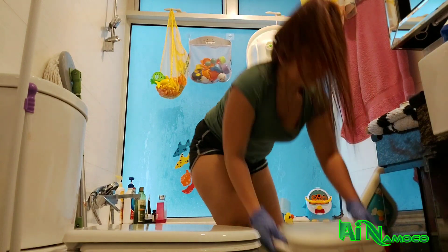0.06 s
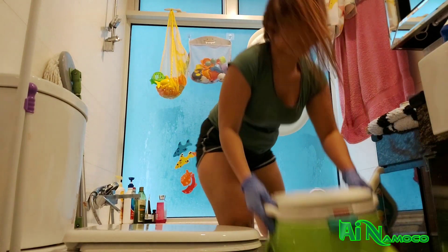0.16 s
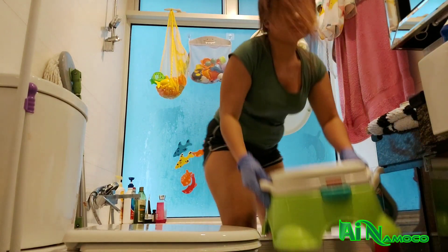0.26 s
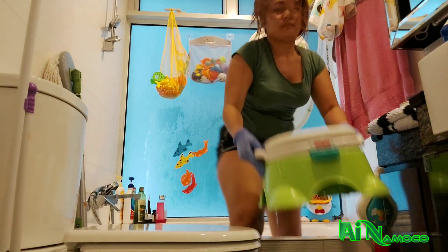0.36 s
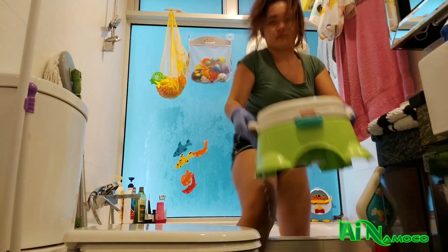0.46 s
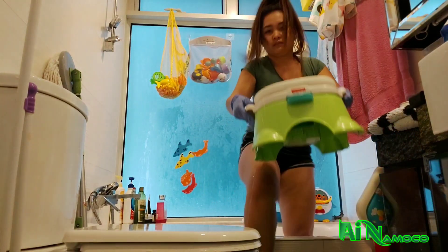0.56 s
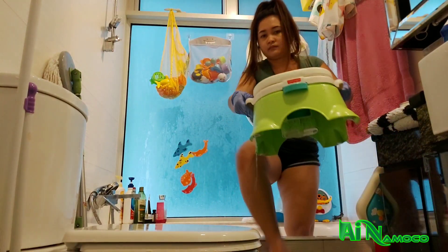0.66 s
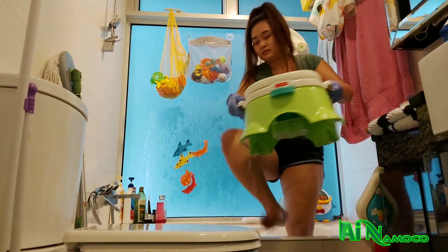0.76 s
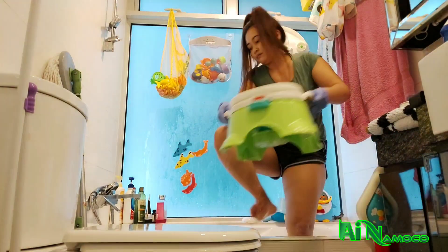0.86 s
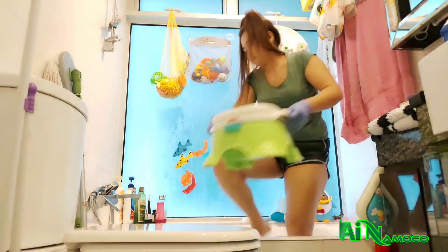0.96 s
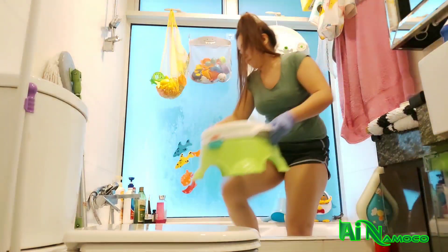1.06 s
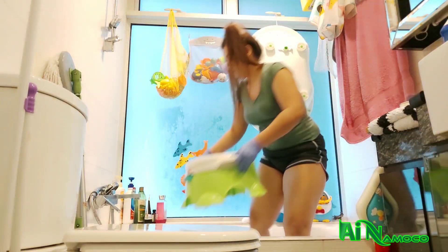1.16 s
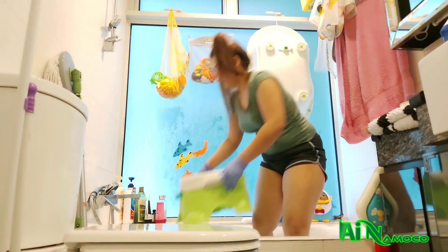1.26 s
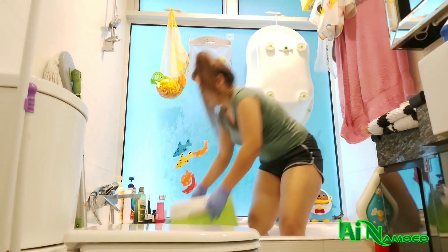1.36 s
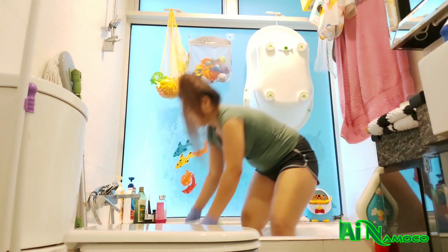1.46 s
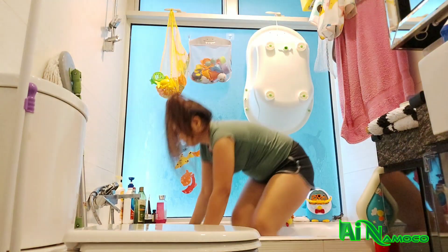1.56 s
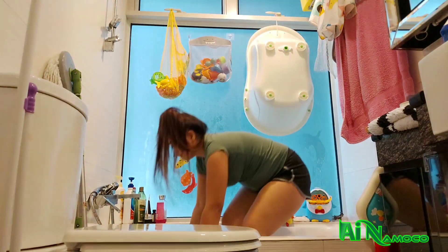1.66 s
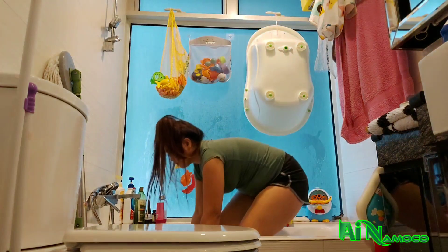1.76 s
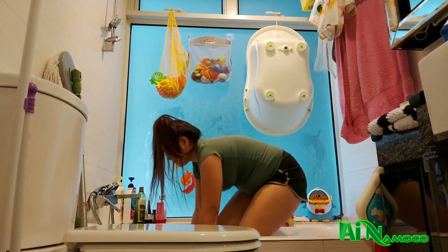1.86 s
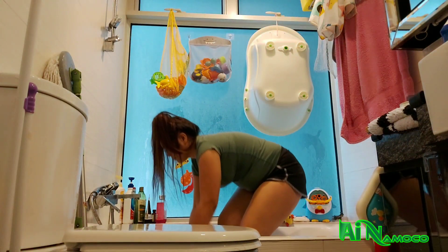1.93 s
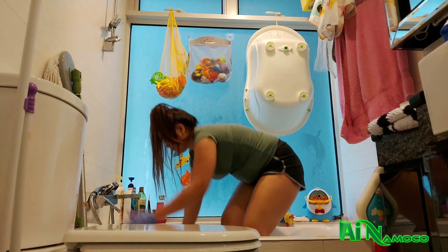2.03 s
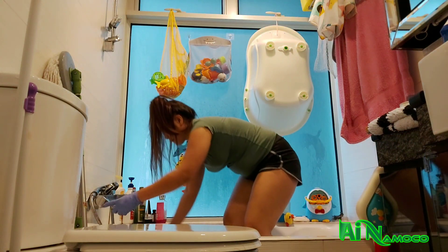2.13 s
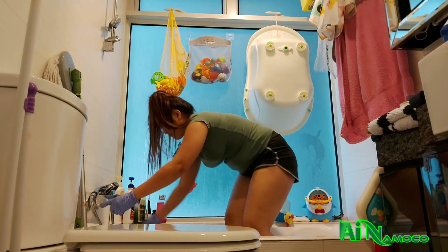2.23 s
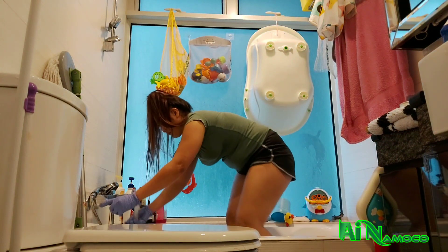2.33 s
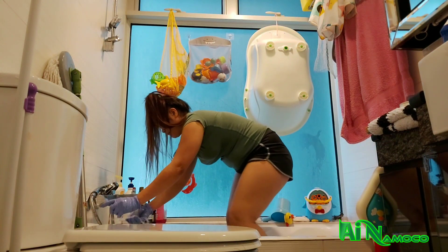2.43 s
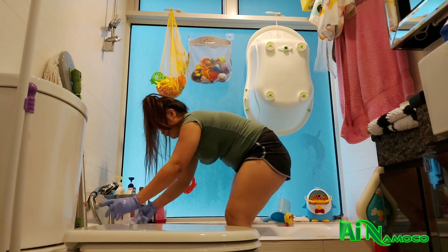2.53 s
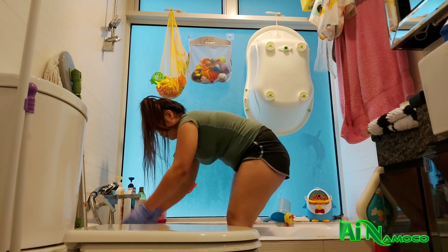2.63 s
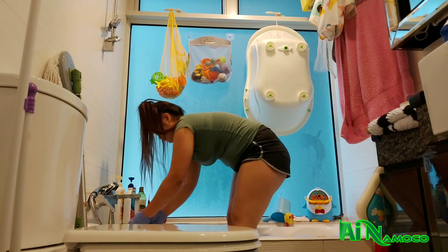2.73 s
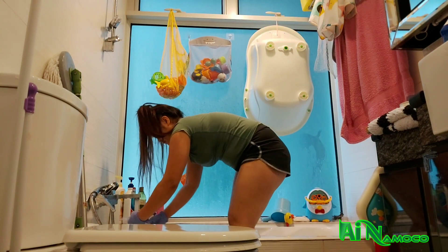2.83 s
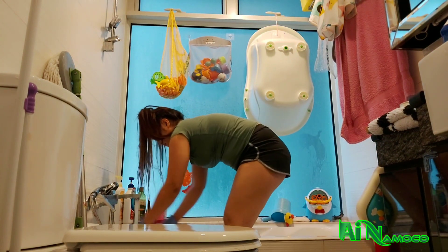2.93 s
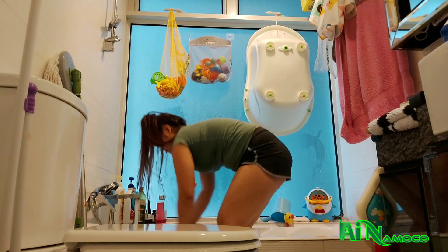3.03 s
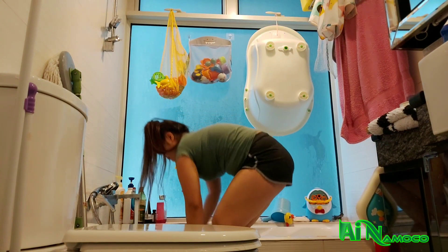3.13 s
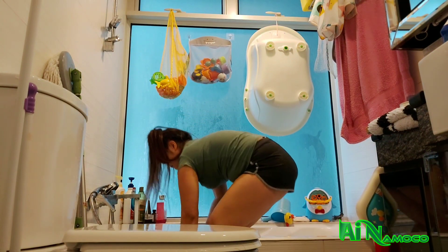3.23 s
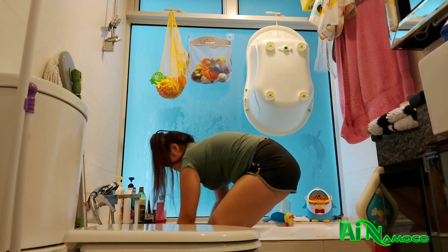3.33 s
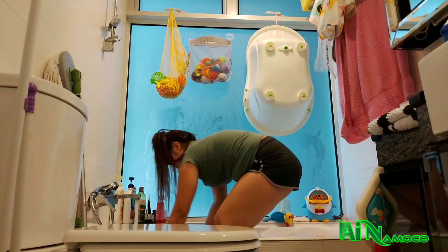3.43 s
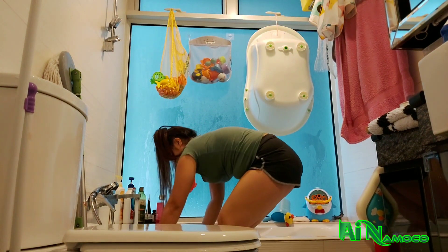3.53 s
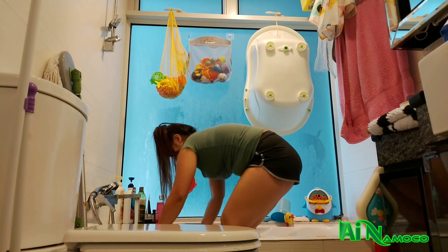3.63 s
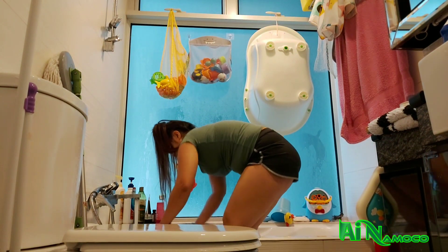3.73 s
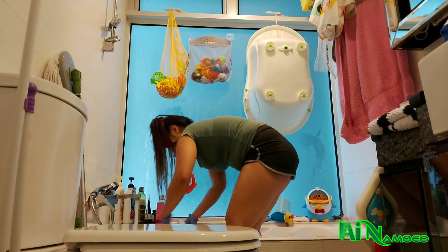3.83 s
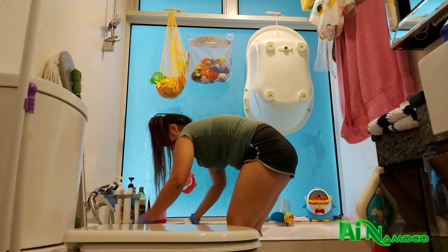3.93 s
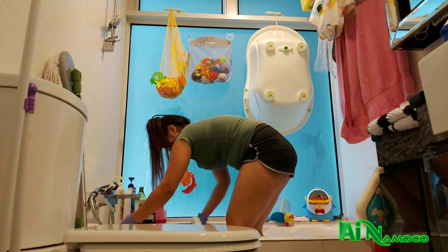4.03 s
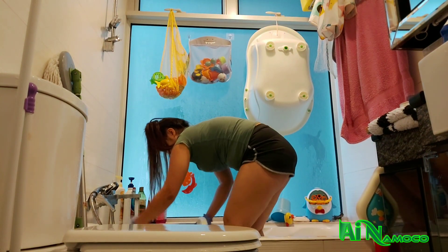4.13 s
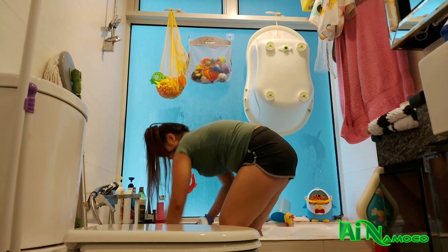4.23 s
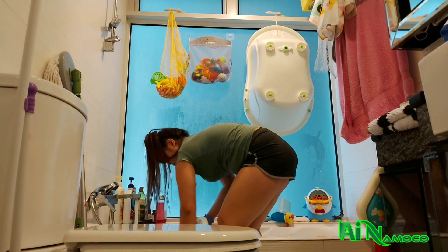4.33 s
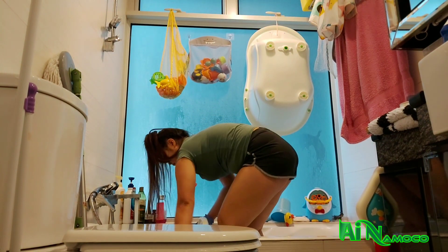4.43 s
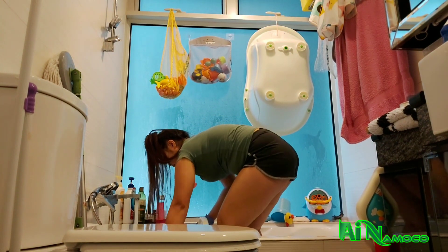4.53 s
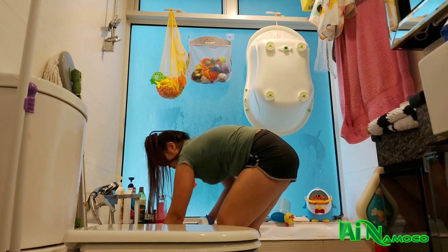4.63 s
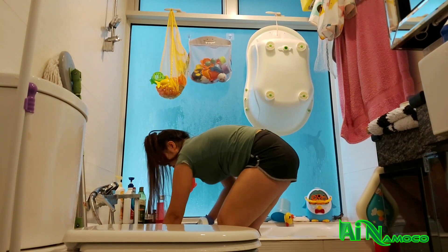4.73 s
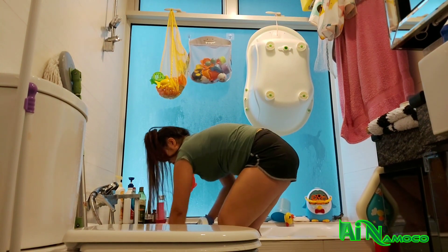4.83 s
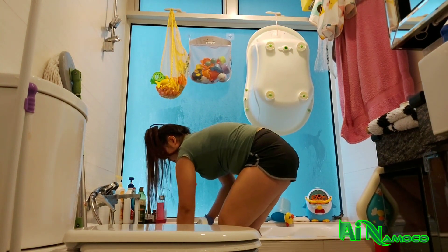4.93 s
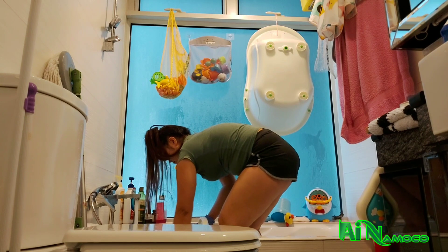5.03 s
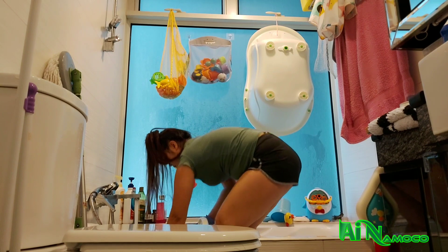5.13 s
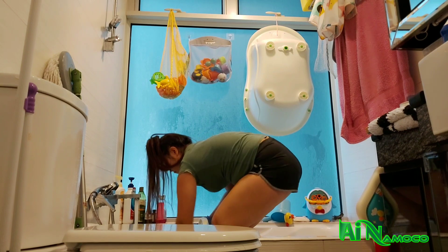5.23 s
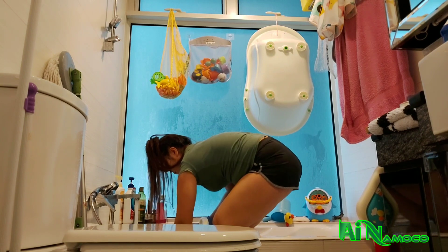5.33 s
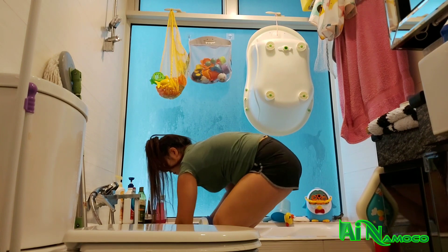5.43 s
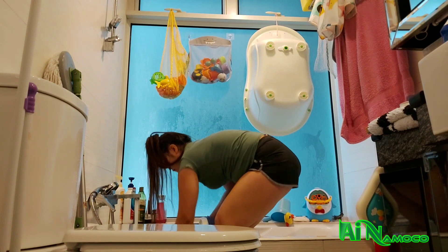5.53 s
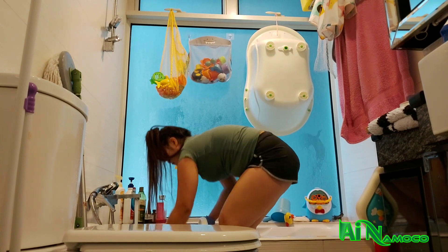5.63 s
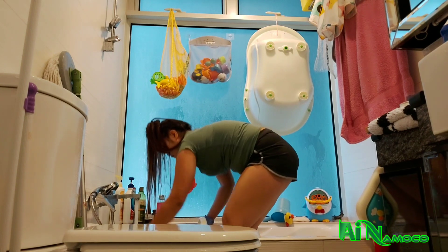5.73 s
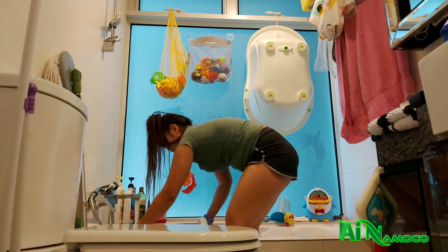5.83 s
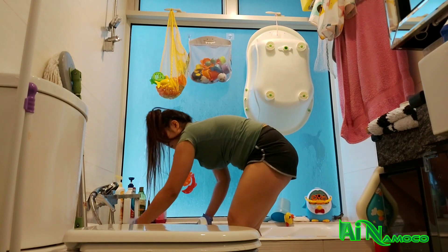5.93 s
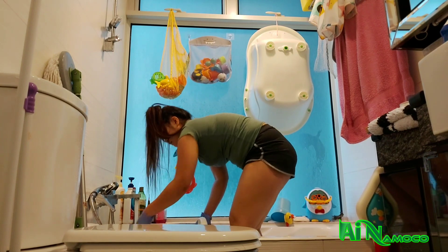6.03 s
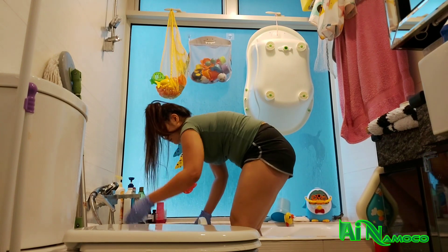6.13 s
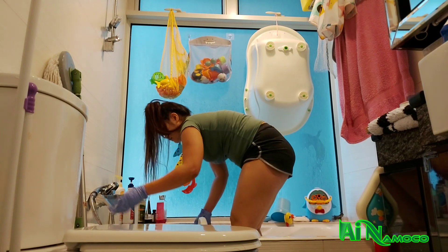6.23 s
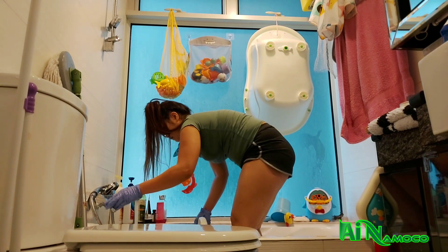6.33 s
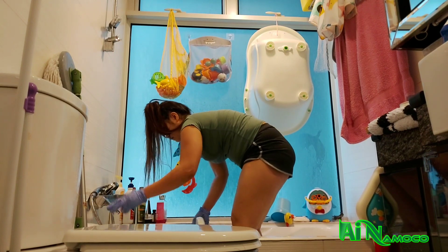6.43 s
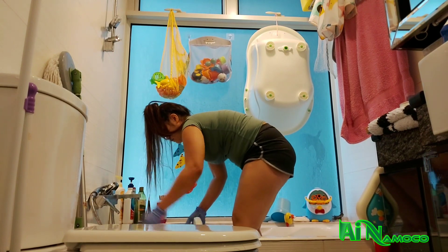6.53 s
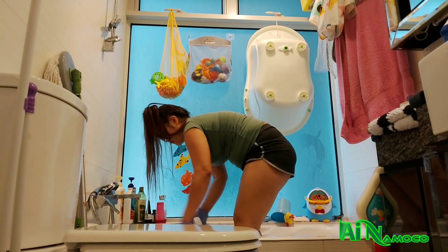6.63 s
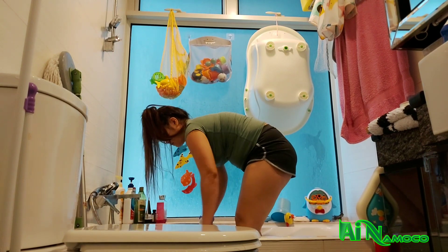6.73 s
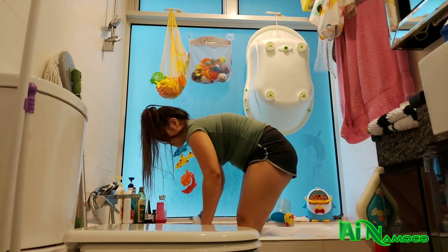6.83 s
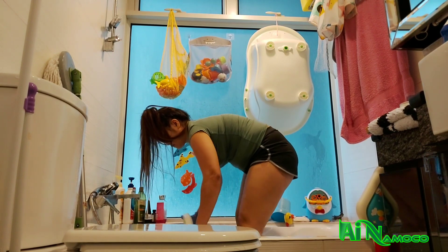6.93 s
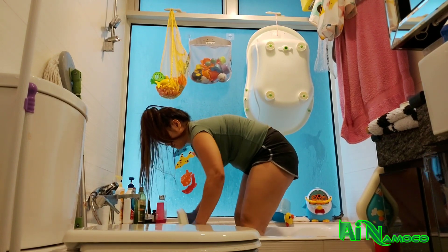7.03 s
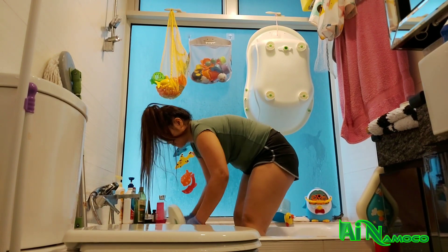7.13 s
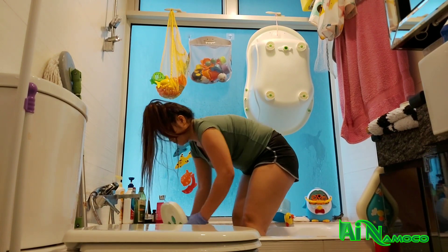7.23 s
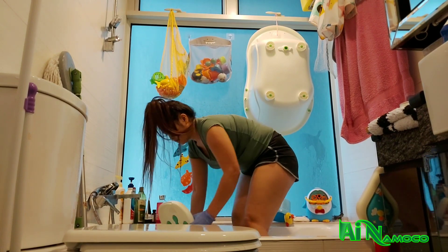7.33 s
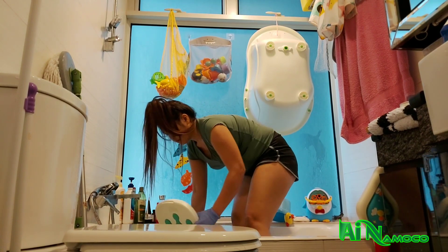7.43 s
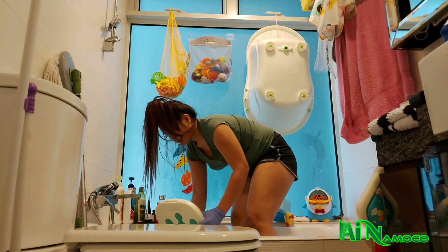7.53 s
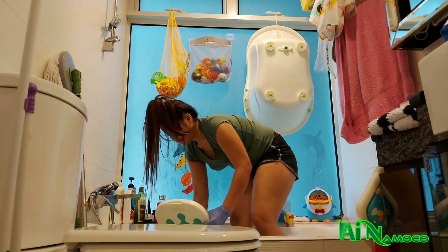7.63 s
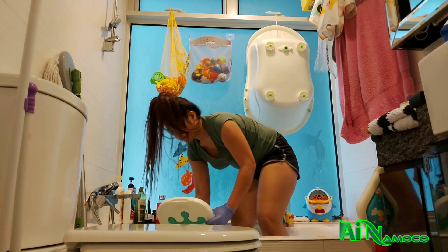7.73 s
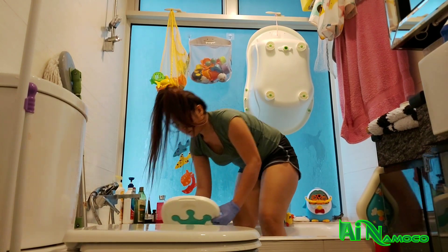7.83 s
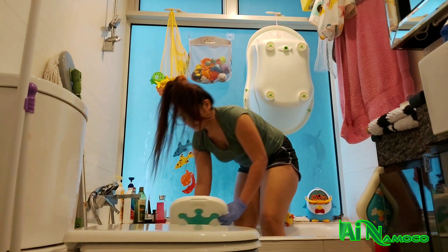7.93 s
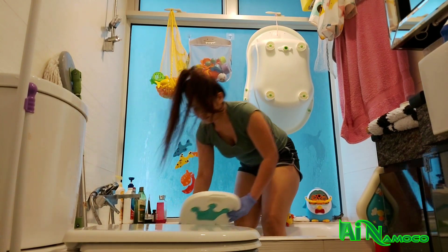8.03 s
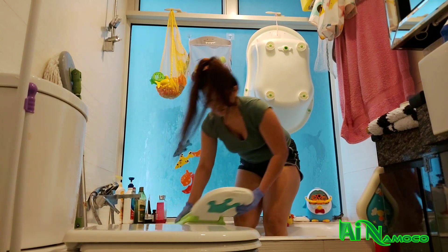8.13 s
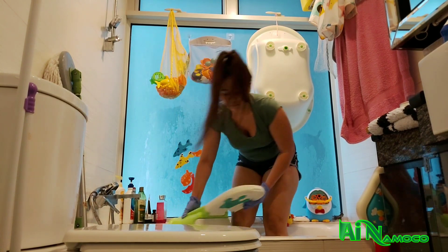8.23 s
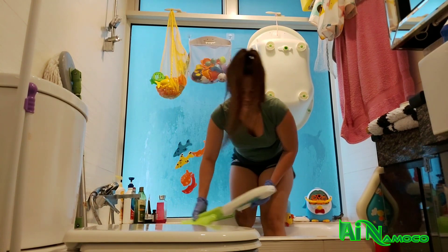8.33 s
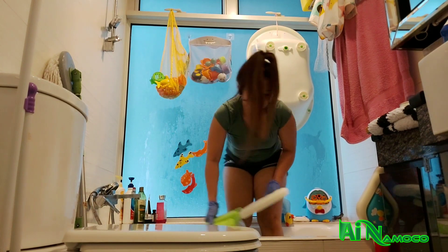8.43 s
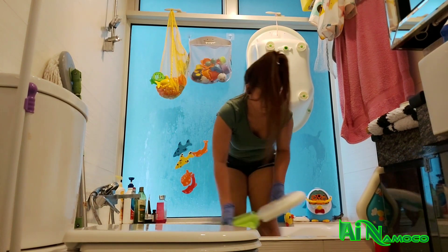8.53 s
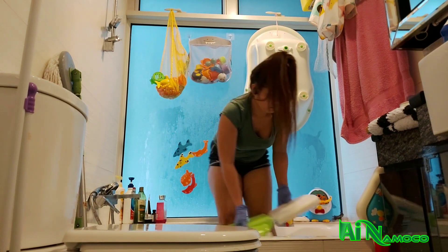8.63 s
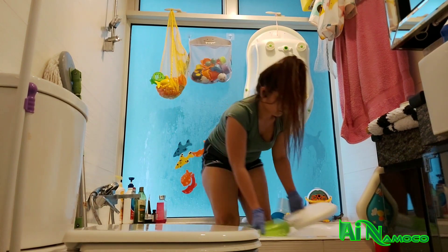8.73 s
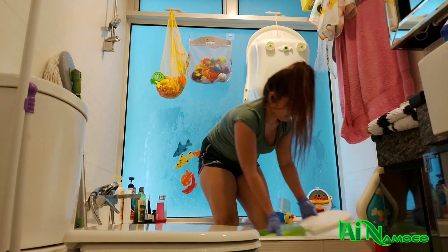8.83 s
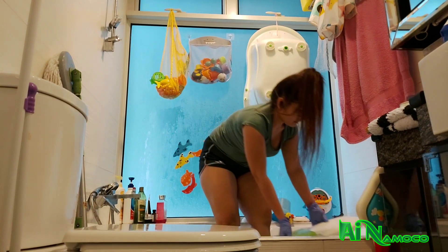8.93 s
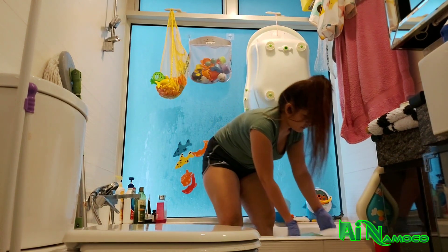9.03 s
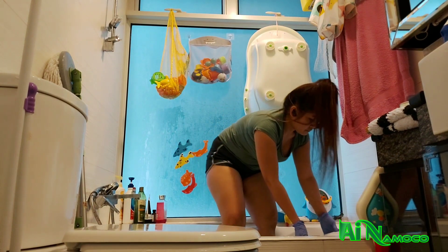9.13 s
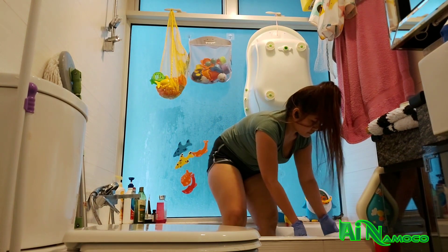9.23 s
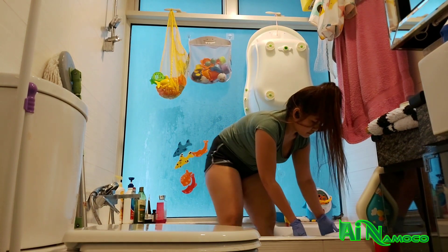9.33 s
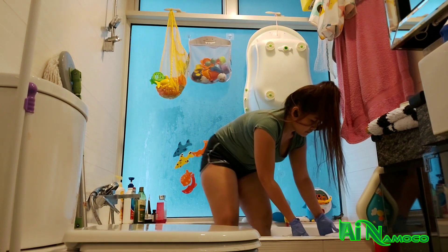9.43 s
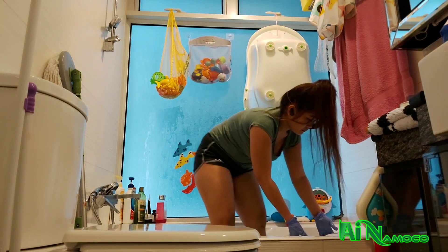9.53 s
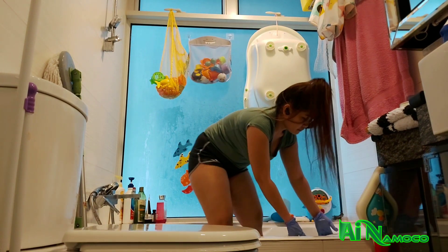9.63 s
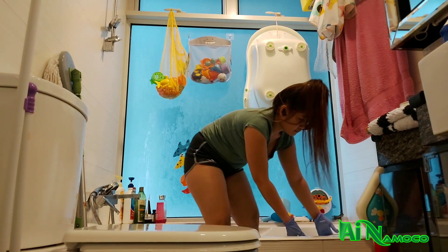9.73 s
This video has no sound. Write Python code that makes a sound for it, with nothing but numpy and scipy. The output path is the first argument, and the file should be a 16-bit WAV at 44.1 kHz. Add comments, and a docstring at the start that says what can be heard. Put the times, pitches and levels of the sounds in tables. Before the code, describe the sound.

A plastic stool clatters hollowly into a bathtub, a hand shower hisses and splatters over it amid knocks, then it is lifted out and set down.

```python
"""A small tiled bathroom, where a bathtub is being cleaned. A plastic step stool is dropped in the tub,
a hand shower hisses over it while it is scrubbed and bumped about, then it is lifted out and set down.
Blows ring the tub's own notes; water, rubs and steps are noise shaped in colour and level; squeaks are
gliding tones. The blows, rubs, squeaks, steps and patter get short, boxy reflections."""
import sys
import numpy as np
from scipy import signal
from scipy.fft import rfft, irfft, next_fast_len
from scipy.io import wavfile
from scipy.ndimage import uniform_filter1d

SR = 44100
rng = np.random.default_rng(int(sys.argv[2]) if len(sys.argv) > 2 else 0)


def transcribe(u):
    """Save the signal u as a 16-bit wav file named by the first command-line argument.

    u: samples, shape (n,) or (channels, n), limited to [-1, 1]; the rate is SR.
    q: integer samples, one column per channel.
    """
    v = np.clip(np.atleast_2d(u).T, -1, 1)
    q = np.round(v * 32767).astype(np.int16)
    wavfile.write(sys.argv[1], SR, q)


N = 430857  # samples in the whole scene
RING = 2 ** 14  # samples given to each ringing sound

# Blows and scrapes of plastic on the tub. Each row: start in seconds, contact length in seconds,
# strength in dB, hardness in dB, thump over the strength in dB, note of the spot struck in Hz,
# that note over the rest in dB.
KNOCKS = [(1.725, 0.029, -36.5, -1.5, 0, 323, -4), (1.746, 0.034, -17, 7, -18, 642, -0.5),
          (1.773, 0.032, -15.5, 1, -28, 316, -3), (1.83, 0.027, -16.5, -0.5, -8.5, 642, -4),
          (1.862, 0.029, -21, -3.5, -13, 425, 1), (1.937, 0.047, -37, -7.5, -10, 440, -4.5),
          (1.989, 0.031, -29.5, 1, -14.5, 690, -4), (2.012, 0.023, -25, -8, -14.5, 319.3, 10),
          (2.028, 0.039, -20, -7.5, -17.5, 323.3, 0), (2.473, 0.034, -46.5, 22, -24, 860, 4),
          (2.654, 0.037, -39.5, -21.5, -3.5, 312, 10.5), (2.691, 0.01, -23.5, -5.5, -19, 662, 6.5),
          (2.722, 0.031, -34, -3, -16.5, 605, -0.5), (2.817, 0.026, -35.5, -17, -6, 293, -13.5),
          (3.121, 0.038, -36, -20, -2, 316, -3), (3.293, 0.035, -33, -4.5, -13.5, 321, -4),
          (3.539, 0.043, -25.5, -4, -5.5, 425, -7), (3.591, 0.032, -22.5, -7, -27.5, 423, 1),
          (3.722, 0.034, -31, -7, -7, 420, -3.5), (3.822, 0.021, -29, -8.5, -5.5, 436, -26),
          (3.848, 0.041, -25.5, -3, -9, 318.5, -7.5), (4.167, .034, -19, 1.5, -11, 316, -5.5),
          (4.332, 0.031, -32.5, -2, -27.5, 337, -7.5), (4.389, 0.037, -30.5, -8, -11, 343, -6.5),
          (4.692, 0.022, -23.5, 5.5, -8.5, 327, -1), (4.738, 0.016, -30, 7, -15, 322, 4),
          (4.773, 0.032, -29, -9, -19, 266, -3.5), (5.052, 0.021, -35, 9, -18, 613, 2),
          (5.229, 0.02, -37, -0.5, -2, 242, -5), (5.247, 0.028, -25.5, -0.5, -10.5, 318, -9.5),
          (5.323, 0.02, -26, -4, -17.5, 355, 3.5), (5.344, 0.029, -18.5, 4.5, -19, 627, -6.5),
          (5.468, 0.032, -20.5, -5, -20, 630, 0.5), (5.518, 0.015, -28, -4, -19, 316, 3.5),
          (5.539, 0.017, -12.5, -3.5, -34.5, 622, 1), (5.562, 0.028, -22, -2, -29, 316, -5),
          (6.741, 0.033, -36, -2.5, -17, 315, -3), (6.786, 0.03, -33.5, -3, -7.5, 603, -3.5),
          (6.858, 0.035, -23.5, 0.5, -7.5, 618, 1), (6.99, 0.029, -44, -6, -14, 315, -12),
          (7.139, 0.08, -41.5, 4, -30, 614, -15), (7.231, 0.012, -26.5, 13, -18, 625, -4),
          (7.237, 0.031, -18, -2.5, -16.5, 316, -12), (7.26, 0.017, -16.5, -5.5, -10.5, 256, -9),
          (7.297, 0.037, -30.5, -4, -10.5, 316, -19), (7.521, 0.41, -46, 1.5, -28, 319, -2.5),
          (7.696, 0.026, -24, -10, -8, 306, -18), (7.808, 0.12, -39, -1, -11, 319.6, -3),
          (7.977, 0.018, -45, 3, -16, 319, -4), (8.373, 0.036, -49.5, 9, -17, 615, -5),
          (8.678, 0.037, -35.5, -1, -17.5, 442, -8), (8.977, 0.04, -39, -4.5, -8, 320, -11),
          (9.027, 0.03, -33.5, -4, -15, 317, -3), (9.073, 0.039, -36.5, -3, -9, 452, -8),
          (9.163, 0.024, -10.5, -2, -5.5, 454, -5), (9.21, 0.032, -27, -7, -10, 618, -13),
          (9.56, 0.044, -43.5, -4, -7.5, 312, -12), (9.677, 0.027, -48.5, -1, -10, 463, -11)]
# The hollow ring of tub and room. Each row: note in Hz, width in Hz, level in dB.
TUB_MODES = [(119.2, 20, -7), (162.1, 24, -2.5), (247.7, 31, -3), (316, 19, 1.5), (378, 66, -1.5),
             (425, 41, -5.5), (470, 55, -3), (545.7, 76, -4.5), (625.5, 57, 1), (702.4, 51, -3),
             (784, 170, -4), (938, 80, -10.5), (1100, 90, -8.5)]
# The brittle top of a blow. Each row: frequency in Hz, level in dB.
CLACK = [(500, -32.5), (1000, 2), (1450, -1), (2200, -8), (3000, -12.5), (4200, -15.5), (6400, -23),
         (7900, -20.5), (16000, -31.5)]
# The stool rebounds once, this long after each blow starts.
REBOUND_S, REBOUND_DB = .035, -15
# The clack relative to its blow grows with hardness, and with strength over a firm blow (dB per dB).
CLACK_DB, CLACK_PER_HARDNESS, CLACK_PER_STRENGTH, FIRM_BLOW_DB = -16.5, 0.88, 0.15, -25
# The room's longest standing wave, which hums on after the blows.
HUM_HZ, HUM_WIDTH_HZ, HUM_DB = 324, 7.8, -8.5

# Colours of the hiss, the splatter, the drumming and the fine mist from the shower head.
# Each row: frequency in Hz, level in dB.
HISS = [(900, -31), (2500, -13), (4000, -2.5), (4900, -5.5), (7050, -1.5), (7700, 3), (9000, 0.4),
        (10500, -1), (12200, 0.5), (14000, -5.5), (16000, -0.5)]
SPLATTER = [(500, -23), (900, -17), (1100, -5.5), (1750, -2.5), (2180, 0.5), (2500, -1.5), (3500, -3),
            (5000, -4), (9000, -16.5)]
DRUM = [(30, -33), (65, -3), (110, -0.5), (200, -8), (320, 1.5), (480, -8.5), (650, -1.5), (850, -2.5),
        (1300, -3.5), (3000, -25)]
MIST = [(900, -7.5), (2100, 1.5), (5000, -15), (6800, -7.5), (8000, -3), (10500, -4), (12300, 5),
        (14000, -0.5), (16000, 1.5)]
MIST_DB = -40
# The tap: when it is fully open and when it starts to close, and how fast the flow comes and goes.
TAP_OPEN_S, TAP_CLOSE_S, OPEN_DB_PER_S, CLOSE_DB_PER_S = 2.462, 6.69, 103, 174
# The first water bursts out of the head abruptly.
FIRST_WATER_S, BURST_DB_PER_S = 2.335, 598
# Spray on the bare tub, before small trims; hiss and splatter start weak and build with the pressure.
BARE_HISS_DB, BARE_SPLATTER_DB, BARE_DRUM_DB = -36, -44.5, -47
WEAK_START_DB, PRESSURE_S = -10.5, 0.39
# Passes of the spray over the stool, before small trims. Each row: start in seconds, end in seconds,
# hiss of the jets in dB, splatter on hollow plastic in dB, drumming on the tub in dB,
# ring of the stool in dB, speed of the rise in dB per second.
PASSES = [(2.851, 2.904, -30, -36, -46, -58.5, 147), (3.131, 3.34, -26.5, -31.5, -39.5, -45.5, 452.5),
          (3.33, 4.062, -27, -33.5, -41.5, -51.5, 450), (4.185, 4.278, -31.5, -50, -40.5, -64, 124),
          (4.338, 5.343, -27, -33.5, -41, -50, 401), (5.36, 5.68, -29.5, -37.5, -36.5, -39, 403),
          (5.75, 5.865, -28, -34, -49, -42.5, 34), (6.209, 6.563, -29, -33.5, -44, -47, 450),
          (6.58, 6.673, -29, -47, -46.5, -61, 200)]
# The spray slides off the stool slowly.
LEAVE_DB_PER_S = 100
# As the tap closes, splatter, drumming and stool ring start to die this much sooner than the hiss.
HEAVY_LEAD_S = 0.092

# Slides of the wet stool in gloved hands. Each row: start in seconds, end in seconds,
# level in dB before a small trim.
SLIDES = [(7.188, 7.413, -38), (8.612, 8.686, -56), (9.122, 9.158, -48)]
# Each slide swells quickly and dies slowly.
SLIDE_RISE_DB_PER_S, SLIDE_FALL_DB_PER_S, SET_DOWN_S = 229, 52, 9.17
# Colour of those slides. Each row: frequency in Hz, level in dB.
RUSTLE = [(50, -7), (200, 1), (400, 5), (900, 6), (1500, -5.5), (2000, -2.5), (2700, -8.5), (3400, -14),
          (4300, -14.5), (6500, -20), (8200, -18), (12000, -19), (16000, -23)]
# Notes of the stool's shell, dragged off the floor. Each row: note in Hz, width in Hz, level in dB.
SHELL_MODES = [(640, 250, 8), (1000, 200, 2), (1610, 83, 9.5), (2140, 200, -5), (2590, 180, -1),
               (3300, 200, -21), (4350, 180, -1), (8200, 2200, -12)]
# Wet rubs and splashes. Each row: start in seconds, length in seconds before easing in,
# level in dB before a common trim, centre in Hz, width in octaves.
RUBS = [(0.194, 0.043, -54, 8700, 1.55), (0.742, .006, -57, 12500, .28), (0.963, 0.018, -62, 7900, .15),
        (0.994, 0.0092, -48, 10500, 0.33), (1.111, 0.059, -56.5, 6000, 2.5), (1.2, 0.25, -80, 2500, .35),
        (1.42, 0.22, -73.5, 2430, 0.63), (1.466, 0.16, -75, 7040, 1.4), (1.661, 0.28, -52, 8040, 2.1),
        (1.892, 0.014, -32.5, 2430, 1.46), (2.019, 0.033, -28.5, 1820, 1.2),
        (2.192, 0.078, -74.5, 5000, 1.03), (2.287, 0.052, -70, 5150, 0.21),
        (6.609, 0.026, -31.5, 4870, 0.58), (6.778, 0.033, -43.5, 7000, 2.9), (6.928, 0.063, -56, 7000, 2.5),
        (7.089, 0.041, -46, 1580, 2.1), (7.347, 0.026, -34, 3300, 1.6), (7.397, 0.027, -37.5, 2580, 1.4),
        (7.504, 0.022, -42, 1820, 0.43), (7.586, 0.019, -43, 3500, 2.4), (7.845, 0.044, -49, 1840, 0.97),
        (7.954, 0.056, -54, 7950, 5.6), (8.23, 0.047, -61, 1940, 0.35), (8.218, 0.026, -64, 7600, 0.29),
        (8.393, 0.023, -62, 4900, 0.2), (8.394, 0.02, -61, 2640, 0.29), (8.409, .04, -57, 1930, 2.5),
        (8.429, 0.036, -46, 8200, 1.56), (8.497, 0.12, -65, 1500, 0.68), (8.624, 0.037, -50.5, 9100, 0.76),
        (8.737, 0.042, -46, 12000, 0.61), (8.682, .045, -64, 1870, .3), (8.745, 0.031, -59, 4230, 0.32),
        (8.901, 0.032, -63.5, 3760, 0.22), (8.902, 0.031, -63, 7600, 0.49), (8.992, 0.053, -62, 8060, 0.34),
        (9.064, 0.025, -45.5, 1650, .45), (9.084, 0.02, -54, 2640, 0.15), (9.087, 0.014, -64, 3900, .15),
        (9.308, 0.022, -70, 7550, .15), (9.389, .02, -58, 3670, .2), (9.391, 0.028, -48, 8100, 1.9),
        (9.414, 0.033, -52, 2520, 0.45), (9.417, 0.012, -57, 1650, 0.28)]
# Tone of every rub, as the microphones take it. Each row: frequency in Hz, level in dB.
SHEEN = [(800, 18), (2700, 1.5), (3500, 1.5), (4300, 0.5), (6600, -1.5), (7800, 3), (11500, -0.5),
         (13500, -2), (16000, -10)]
# Squeaks of wet gloves on plastic. Each row: start in seconds, length in seconds, level in dB,
# start pitch in Hz, end pitch in Hz.
SQUEAKS = [(7.505, 0.025, -41, 1047, 1490), (8.235, 0.023, -68, 1780, 1950),
           (8.398, .035, -64.5, 2330, 2480), (8.534, .07, -63.5, 1270, 1350),
           (9.071, .022, -50, 1650, 1470), (9.08, 0.024, -52, 2870, 2730), (9.408, 0.047, -57, 2560, 2790)]
# Soft footfalls. Each row: start in seconds, level in dB before a common trim.
STEPS = [(0.649, -49), (0.8, -48), (.86, -49), (1.061, -37.5), (1.299, -50), (1.491, -48), (8.168, -51.5),
         (8.312, -53), (8.43, -47), (8.619, -46), (8.78, -45)]
# Steady room air. Each row: frequency in Hz, level in dB.
AIR = [(15, -30), (25, -21), (82, 3), (125, 2), (185, -22), (232, -1.5), (270, -7.5), (405, -5), (516, -9),
       (560, -18), (677, -14.5), (1290, -30), (1750, -27), (2150, -37.5), (2700, -35.5), (5880, -46.5),
       (7920, -35.5), (16000, -47)]
AIR_DB = -55.5

# How long the room rings. Each row: frequency in Hz, time to fall by 60 dB in seconds.
ROOM_DECAY = [(100, 0.2), (300, 0.3247), (700, 0.1744), (2000, 0.21), (8000, 0.24), (16000, 0.22)]
# How alike left and right are. Each row: frequency in Hz, likeness (1 is identical).
LIKENESS = [(60, 0.89), (150, 0.9), (300, 0.78), (550, .55), (1000, 0.027), (4000, 0.033), (16000, 0.14)]
# Balance of the microphones. Each row: frequency in Hz, left minus right in dB.
BALANCE = [(60, 1.3), (130, -1), (280, -4), (600, -0.5), (1300, -2), (2400, -7), (4400, 0), (8100, -6.5),
           (15000, -5)]
# Top of the band that is kept.
EDGE_HZ = 15850


def knocks(thump_hz=205, body_hz=930, hard_hz=480, sharp_s=0.019, scrape_s=0.028, uneven_db=1.5):
    """Each blow rings the tub, thumps, clacks the plastic and rebounds; long contacts blur into scrapes."""
    hz, out = bins(RING) + 1, np.zeros((2, N))
    tub = resonances(TUB_MODES, hz, between_db=-33.5)
    low = 1 / np.sqrt(1 + (hz / thump_hz) ** 14) / np.sqrt(1 + (100 / hz) ** 8)
    body = 1 / np.sqrt(1 + (220 / hz) ** 12) / np.sqrt(1 + (hz / body_hz) ** 12)
    gap = np.zeros(round(REBOUND_S * SR))
    mode_hz, _, mode_db = np.transpose(TUB_MODES)
    for s, length, db, hardness_db, weight_db, note_hz, note_db in KNOCKS:
        length = max(length, .005)
        # short contacts begin with a sharp blow, long ones mostly slip
        first = min((sharp_s / length) ** 2, 1)
        force = contact(0.854 * length, slips_per_s=900, first=first)
        rebound = contact(0.854 * length, slips_per_s=900, first=first)
        force = np.r_[force, gap] + gain_of(REBOUND_DB) * np.r_[gap, rebound]
        blow = heard(force, room(early_t60=0.05, tail_db=-11.5, swell_s=0.0047))
        # hard blows are brighter
        tilt = gain_of(.5 * hardness_db * np.tanh(3 * np.log2(hz / hard_hz)))
        clack_db = CLACK_DB + CLACK_PER_HARDNESS * hardness_db
        clack_db += CLACK_PER_STRENGTH * (db - FIRM_BLOW_DB)
        # the struck note and the rest share the strength
        hollow_db = db - 10 * np.log10(1 + gain_of(note_db) ** 2)
        scraped = 1 / (1 + (scrape_s / length) ** 2)
        struck = np.arange(len(TUB_MODES)) == np.argmin(abs(mode_hz - note_hz))
        power = struck * gain_of(hollow_db + note_db) ** 2
        for band, band_db in ((body * tilt, hollow_db), (low, db + weight_db)):
            uneven = mode_db + uneven_db * rng.standard_normal(len(TUB_MODES))
            sizes = np.interp(mode_hz, hz, band) * gain_of(uneven)
            power = power + (1 - scraped) * (gain_of(band_db) * sizes / np.linalg.norm(sizes)) ** 2
            scrape = at_level(colour(blow, tub * band), length, band_db)
            add(out, s - .005, np.sqrt(scraped) * scrape)
        add(out, s, tub_ring(np.where(struck, note_hz, mode_hz), np.sqrt(power), length))
        clack = colour(blow, gain_of(read(CLACK, hz)))
        add(out, s - .002, at_level(clack, length, db + clack_db))
    hum = signal.lfilter(*signal.iirpeak(HUM_HZ, HUM_HZ / HUM_WIDTH_HZ, fs=SR), out)
    return out + gain_of(HUM_DB) * hum


def tub_ring(mode_hz, sizes, length, rise_s=0.0038, sag_s=0.11, echo_db=-15, waver=0.024, apart_hz=800):
    """The tub's notes swell, last with the contact, drop by their own damping and linger in the room."""
    t = np.arange(RING) / SR
    hz, width = mode_hz[:, None], np.array(TUB_MODES)[:, 1:2]
    driven = np.exp(-t / sag_s - np.pi * width * np.maximum(t - length, 0))
    echo = gain_of(echo_db - 60 * t / read(ROOM_DECAY, hz))
    swell = (1 - np.exp(-(t / rise_s) ** 2)) * (driven + echo)
    count = int((length + .01) * SR)
    swell /= np.sqrt(np.mean(swell[:, :count] ** 2, 1, keepdims=True) / 2)
    # the pitch wavers only while plastic touches the tub
    bend = waver * evened(uniform_filter1d(rng.standard_normal(RING), size=300)) * (t < length)
    phase = 2 * np.pi * (hz * np.cumsum(1 + bend) / SR + rng.random(hz.shape))
    # left and right drift out of step as the notes get higher
    apart = (rng.standard_normal(len(hz)) * mode_hz / apart_hz) * np.array([[.5], [-.5]])
    return ((sizes * np.exp(1j * apart)) @ (swell * np.exp(1j * phase))).real


def shower(hiss_db=-0.06, splatter_db=-0.38, flutter_db=.5, splash_db=0.5, throb_db=1.5,
           sway_db=0.37, hollow=0.37):
    """Jets hiss, splatter on plastic, ring the stool and drum on the tub over mist, fluttering together."""
    hiss, splatter, drum, ring = spray_levels()
    jets = patter(per_s=3500, uneven_db=3.5, wash_db=-2.5, count=5)
    drops = patter(per_s=1700, uneven_db=2.5, wash_db=-5.5, count=5)
    mist = MIST_DB + held_db(TAP_OPEN_S, TAP_CLOSE_S, OPEN_DB_PER_S, CLOSE_DB_PER_S)
    # the drumming borrows part of the tub's hollow colour
    hz = np.geomspace(30, 3000, 400)
    tub_db = 20 * np.log10(resonances(TUB_MODES, hz, between_db=-10))
    drummed_tub = np.c_[hz, read(DRUM, hz) + hollow * tub_db]
    water = gain_of(hiss + hiss_db + sway_db * wander(per_s=8.5)) * shaped(jets, HISS)
    water += gain_of(mist) * shaped(rng.standard_normal((2, N)), MIST)
    splashes = shifting(shaped(drops, SPLATTER), depth_db=1.2, patch_hz=700, patch_s=.025)
    water += gain_of(splatter + splatter_db + splash_db * wander(per_s=22)) * splashes
    water += gain_of(ring) * stool_ring(drops)
    drumming = shaped(rng.standard_normal((2, N)), drummed_tub)
    water += gain_of(drum + throb_db * wander(per_s=13)) * drumming
    burst_db = held_db(FIRST_WATER_S, N / SR, BURST_DB_PER_S, 0)
    return water * gain_of(flutter_db * wander(per_s=38) + burst_db)


def spray_levels():
    """Levels in dB of hiss, splatter, drumming and stool ring: bare spray, lifted by each stool pass."""
    since_open = np.maximum(np.arange(N) / SR - TAP_OPEN_S, 0)
    weak_db = WEAK_START_DB * np.exp(-since_open / PRESSURE_S)
    levels = np.array([BARE_HISS_DB + weak_db, BARE_SPLATTER_DB + weak_db,
                       np.full(N, BARE_DRUM_DB), np.full(N, -np.inf)])
    for start, end, *tops, rise_db_per_s in PASSES:
        swell_db = held_db(start, end, rise_db_per_s, LEAVE_DB_PER_S)
        levels = np.maximum(levels, np.array(tops)[:, None] + swell_db)
    fine = held_db(TAP_OPEN_S, TAP_CLOSE_S, OPEN_DB_PER_S, CLOSE_DB_PER_S)
    heavy = held_db(TAP_OPEN_S, TAP_CLOSE_S - HEAVY_LEAD_S, OPEN_DB_PER_S, CLOSE_DB_PER_S)
    return levels + [fine, heavy, heavy, heavy]


def patter(per_s, uneven_db, wash_db, count=1, spots_per_s=14):
    """Dense uneven impacts over a finer wash; they move across spots, each with its own reflections."""
    hits = rng.standard_normal(N) * (rng.random(N) < per_s / SR)
    hits *= gain_of(uneven_db * np.minimum(rng.exponential(1, N), 4))
    spot = np.floor(spots_per_s * np.arange(N) / SR + rng.random(N)) % count
    near = np.zeros((2, N))
    for k in range(count):
        reflections = room(early_t60=0.05, tail_db=-9.0, swell_s=0.00089)[:, :RING // 2]
        near += signal.oaconvolve((hits * (spot == k))[None], reflections, axes=1)[:, :N]
    return evened(near) + gain_of(wash_db) * rng.standard_normal((2, N))


def shifting(pair, depth_db, patch_hz, patch_s):
    """The colour of a splash shifts in patches as the water lands in new places."""
    z = signal.stft(pair, SR, nperseg=512)[2]
    field = rng.standard_normal(z.shape[1:])
    for _ in range(2):
        field = uniform_filter1d(field, max(int(patch_hz * 512 / SR), 1), axis=0)
        field = uniform_filter1d(field, max(int(patch_s * SR / 256), 1), axis=1)
    return signal.istft(z * gain_of(depth_db * evened(field)), SR, nperseg=512)[1][:, :N]


def stool_ring(drops, centre_hz=2200, width_hz=520, drift=0.017):
    """Drops ring the hollow stool; the note drifts as the spray moves across it."""
    note_hz = centre_hz * (1 + drift * wander(per_s=7.5))
    turn = np.exp(2j * np.pi * np.cumsum(note_hz) / SR)
    # shift the note down to zero, keep what is near it, shift back
    ring = signal.lfilter(*signal.butter(2, width_hz / 2, fs=SR), drops / turn)
    return evened((ring * turn).real)


def handling(level_db=-0.5, release_db_per_s=250):
    """A wet rustle while the stool is turned over and lifted out; it dies fast once the stool is set down."""
    grip = np.zeros(N)
    for start, end, db in SLIDES:
        grip += gain_of(db + held_db(start, end, SLIDE_RISE_DB_PER_S, SLIDE_FALL_DB_PER_S))
    carried_db = held_db(0, SET_DOWN_S, 0, release_db_per_s)
    rustle = shaped(patter(per_s=2200, uneven_db=3.5, wash_db=1.0), RUSTLE)
    return grip * gain_of(level_db + carried_db) * rustle


def drag(level_db=-50, start_s=0.54, end_s=0.57, rise_db_per_s=190, fall_db_per_s=185):
    """The stool's shell sings faintly under a rub that swells and fades."""
    swell_db = held_db(start_s, end_s, rise_db_per_s, fall_db_per_s)
    hz = np.geomspace(200, 16000, 400)
    shell_db = 20 * np.log10(resonances(SHELL_MODES, hz, between_db=-37))
    ring = np.r_[[(50, -40)], np.c_[hz, shell_db]]
    return gain_of(level_db + swell_db) * shaped(patter(per_s=1300, uneven_db=0, wash_db=-1.0), ring)


def rubs(level_db=-3.0, ease_s=.003):
    """Wet gloves and sloshed water: short crackling strokes that ease in, each in its own band."""
    hz, out = bins(RING) + 1, np.zeros((2, N))
    for s, length, db, centre_hz, width in RUBS:
        length = length + ease_s
        force = contact(length, slips_per_s=1500, first=.05, taper=0.54)
        stroke = heard(force, room(early_t60=0.024, tail_db=-14.5, swell_s=0.0034))
        octaves_away = np.log2(hz / centre_hz)
        band = gain_of(read(SHEEN, hz)) / (1 + .5 * (octaves_away / width) ** 2) ** 2
        add(out, s - .006, at_level(colour(stroke, band), length, db + level_db))
    return out


def squeaks(overtone_db=-13, jitter=.025, room_db=-2):
    """Wet rubber sticks and slips on plastic: a short, unsteady tone that glides, with one overtone."""
    out = np.zeros((2, N))
    for s, length, db, start_hz, end_hz in SQUEAKS:
        count = int(max(length, .005) * SR)
        unsteady = evened(uniform_filter1d(rng.standard_normal(count), size=30))
        pitch = np.linspace(start_hz, end_hz, count) * (1 + jitter * unsteady)
        phase = 2 * np.pi * np.cumsum(pitch) / SR
        tone = np.sin(phase) + gain_of(overtone_db) * np.sin(2 * phase)
        tone *= signal.windows.tukey(count, .7)
        echo = heard(np.ones(1), room(early_t60=0.064, tail_db=-11, swell_s=.004))
        echo = gain_of(room_db) * echo / np.linalg.norm(echo[0])
        squeak = signal.fftconvolve(echo, tone[None], axes=1)
        add(squeak, 0, np.array([tone, tone]))  # the direct sound
        add(out, s, at_level(squeak, length, db))
    return out


def steps(top_hz=150, length=0.045, level_db=-9.0):
    """Bare feet push softly on the floor: a few small slips, heard only as a dull low thud."""
    hz, out = bins(RING) + 1, np.zeros((2, N))
    dull = 1 / np.sqrt(1 + (hz / top_hz) ** 6) / np.sqrt(1 + (65 / hz) ** 6)
    for s, db in STEPS:
        force = contact(length, slips_per_s=250, first=0.5)
        push = heard(force, room(early_t60=0.068, tail_db=-16.0, swell_s=0.0058))
        add(out, s, at_level(colour(push, dull), length, db + level_db))
    return out


def air():
    """The low steady rush of the room: noise with a fixed colour."""
    return gain_of(AIR_DB) * shaped(rng.standard_normal((2, N)), AIR)


def contact(length, slips_per_s, first, taper=.5):
    """Force on a surface: one first blow, then uneven slips that swell and ease during the contact."""
    count = max(int(length * SR), 64)
    force = rng.standard_normal(count) * (rng.random(count) < slips_per_s / SR)
    force *= signal.windows.tukey(count, taper)
    force /= np.linalg.norm(force) + 1e-9
    force[0] += first
    return force


def room(early_t60, tail_db, swell_s):
    """Echoes from a spot down in the tub: close reflections build up, then a tail dies by band."""
    hz, t, z = signal.stft(rng.standard_normal((2, RING)), SR, nperseg=256)
    fading = z * gain_of(-60 * t / read(ROOM_DECAY, hz)[:, None])
    tail = signal.istft(fading, SR, nperseg=256)[1][:, :RING]
    age = np.arange(RING) / SR
    early = rng.standard_normal((2, RING)) * gain_of(-60 * age / early_t60)
    return (early + gain_of(tail_db) * tail) * (1 - np.exp(-(age / swell_s) ** 2))


def heard(force, response):
    """A force as it reaches the two microphones, with nearly equal energy in every band."""
    pair = spread(signal.fftconvolve(response, force[None], axes=1)[:, :RING])
    total = np.r_[0, np.cumsum(abs(rfft(pair.mean(0))) ** 2)]
    k = np.arange(len(total) - 1)
    half = 12 + k // 10  # bands widen with frequency
    lo, hi = np.maximum(k - half, 0), np.minimum(k + half, len(k))
    band_energy = total[hi] - total[lo] + 1e-12
    gain = np.sqrt(total[-1] / len(k) * (hi - lo) / band_energy)
    return colour(pair, uniform_filter1d(gain, size=13))


def spread(pair):
    """Two unrelated signals become a microphone pair that shares the long waves."""
    size = next_fast_len(pair.shape[1], True)
    a, b = rfft(pair, size)
    same = np.clip(read(LIKENESS, bins(size)), -1, 1)
    mid, side = a * np.sqrt(1 + same), b * np.sqrt(1 - same)
    return irfft(np.array([mid + side, mid - side]), size)[:, :pair.shape[1]]


def shaped(pair, spectrum):
    """A long stereo sound with this spectrum and unit rms in the middle."""
    size = next_fast_len(N, True)
    gain = gain_of(read(spectrum, bins(size)))
    out = irfft(rfft(spread(pair), size) * gain, size)[:, :N]
    return out / out.mean(0).std()


def resonances(modes, hz, between_db):
    """Gain of a body's modes over a flat bed."""
    power = sum(gain_of(db) ** 2 / (1 + (2 * (hz - f) / width) ** 2) for f, width, db in modes)
    return np.sqrt(power + gain_of(between_db) ** 2)


def colour(x, gain):
    """Filter with this gain in each bin that acts only after the sound arrives (minimum phase)."""
    log_gain = np.log(np.maximum(gain, 1e-5))
    response = np.exp(np.conj(signal.hilbert(np.r_[log_gain, log_gain[-2:0:-1]])))
    return irfft(rfft(x) * response[:len(gain)])


def wander(per_s):
    """A smooth random curve of unit rms, made of slow sines up to this many turns a second."""
    t = np.arange(0, N, 128) / SR
    curve = sum(np.sin(2 * np.pi * (per_s * f * t + rng.random())) for f in np.geomspace(.1, 1, 12))
    return np.interp(np.arange(N) / SR, t, evened(curve))


def held_db(start, end, rise_db_per_s, fall_db_per_s):
    """An envelope in dB: rises to 0 at start, holds until end, then falls."""
    t = np.arange(N) / SR
    before = rise_db_per_s * np.maximum(start - t, 0)
    after = fall_db_per_s * np.maximum(t - end, 0)
    return np.maximum(-before - after, -200)


def at_level(sound, length, db):
    """Gives a sound this rms level over its contact and 10 ms more."""
    count = int((length + .01) * SR)
    return sound * gain_of(db) / (sound.mean(0)[:count].std() + 1e-12)


def add(mix, s, sound):
    """Mixes a stereo sound in at time s."""
    part = mix[:, max(round(s * SR), 0):][:, :sound.shape[1]]
    part += sound[:, :part.shape[1]]


def gain_of(db):
    """Decibels to amplitude."""
    return 10 ** (np.asarray(db) / 20)


def evened(x):
    """Scales to unit rms."""
    return x / np.sqrt(np.mean(x ** 2) + 1e-20)


def read(points, hz):
    """A table's value along a log-frequency axis."""
    f, value = np.transpose(points)
    return np.interp(np.log(hz + 1), np.log(f + 1), value)


def bins(size):
    """Frequencies of a spectrum of this many samples."""
    return np.fft.rfftfreq(size, 1 / SR)


def scene():
    """All the sounds of the bathroom."""
    return knocks() + shower() + handling() + drag() + rubs() + squeaks() + steps() + air()


def record(dry):
    """The right microphone is louder in most bands; peaks round off near full scale; then the band limit."""
    size = next_fast_len(N, True)
    lean = gain_of(read(BALANCE, bins(size)))
    sides = np.array([2 * lean, 2 + 0 * lean]) / (1 + lean)
    pair = irfft(rfft(dry, size) * sides, size)[:, :N]
    rounded = pair / (1 + pair ** 6) ** (1 / 6)
    low_pass = signal.firwin(511, EDGE_HZ, window=("kaiser", 9), fs=SR)
    return signal.oaconvolve(rounded, low_pass[None], "same")


dry = scene()
out = record(dry)
transcribe(out)
```